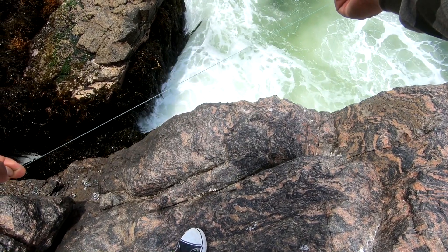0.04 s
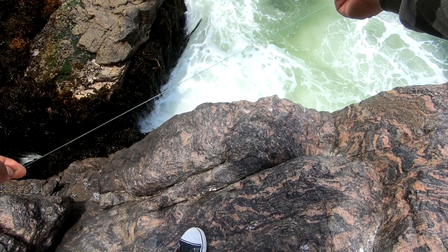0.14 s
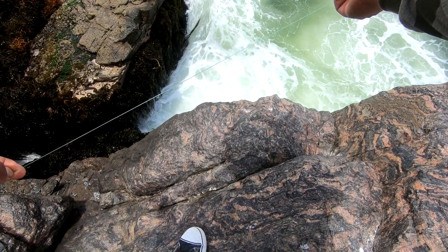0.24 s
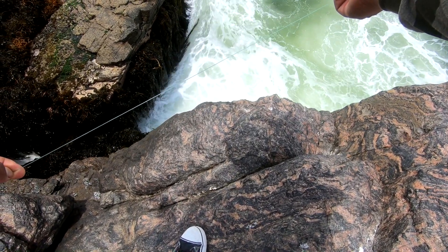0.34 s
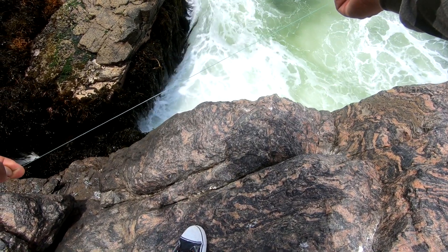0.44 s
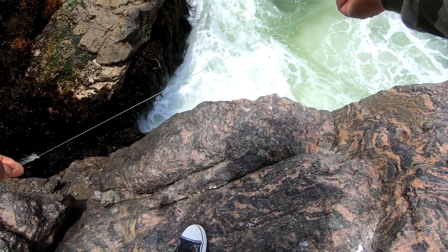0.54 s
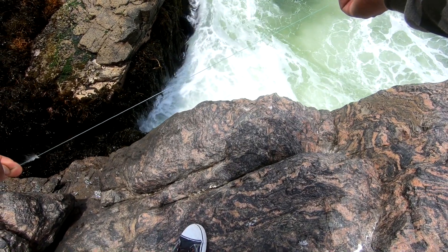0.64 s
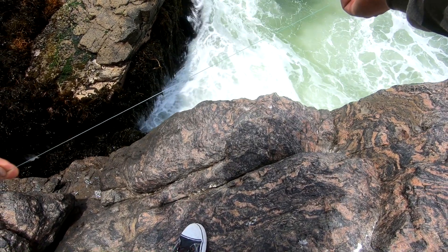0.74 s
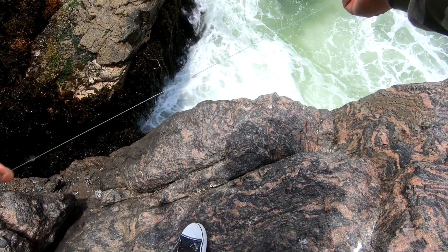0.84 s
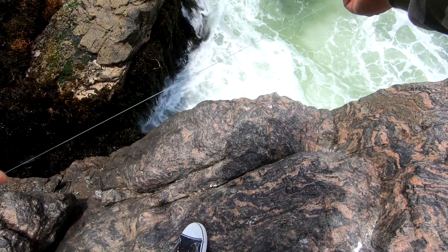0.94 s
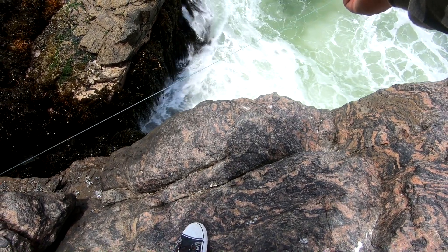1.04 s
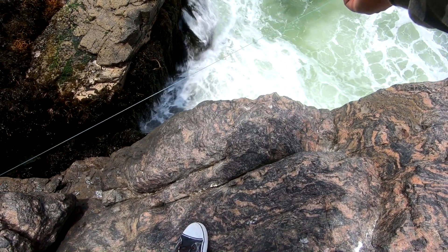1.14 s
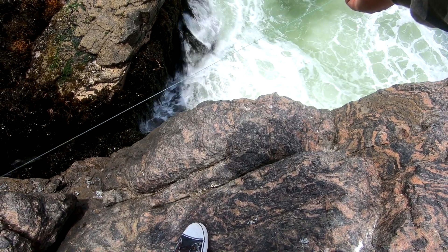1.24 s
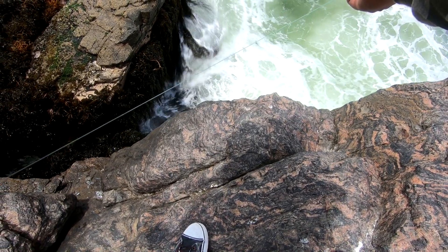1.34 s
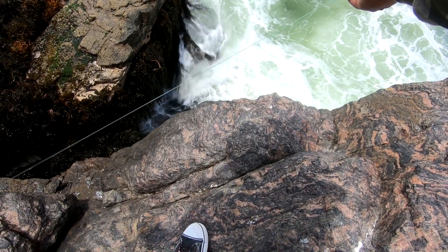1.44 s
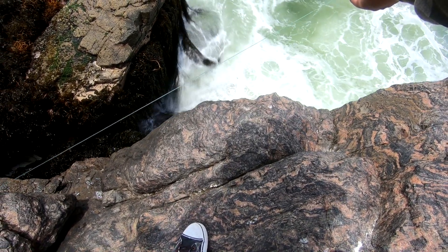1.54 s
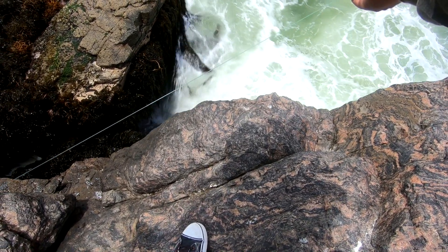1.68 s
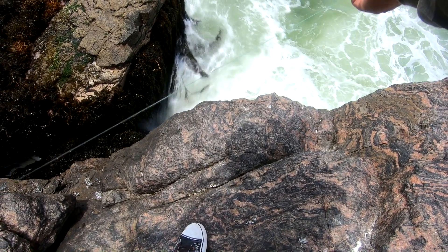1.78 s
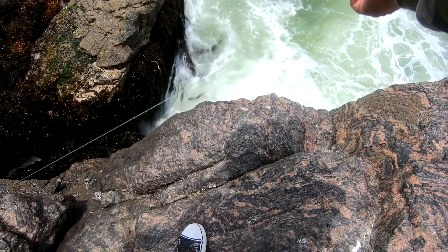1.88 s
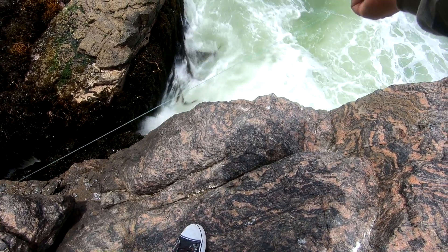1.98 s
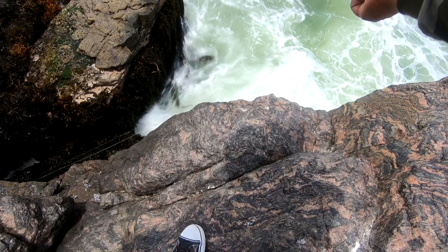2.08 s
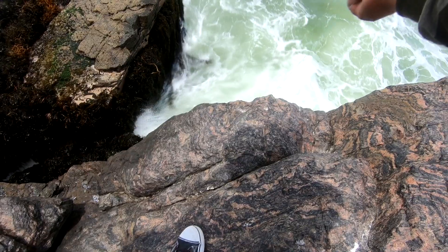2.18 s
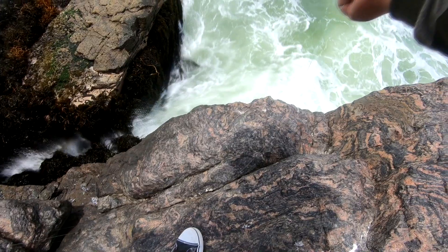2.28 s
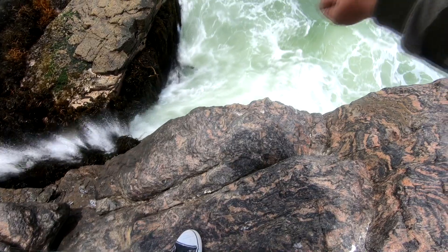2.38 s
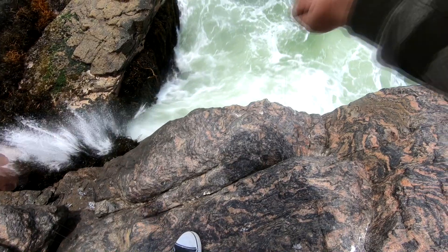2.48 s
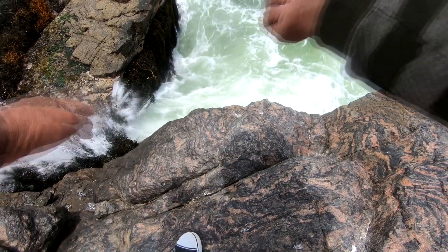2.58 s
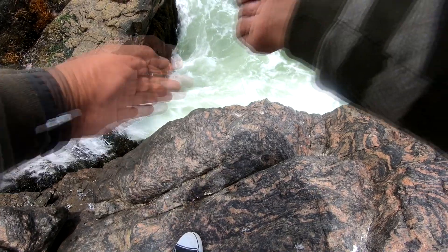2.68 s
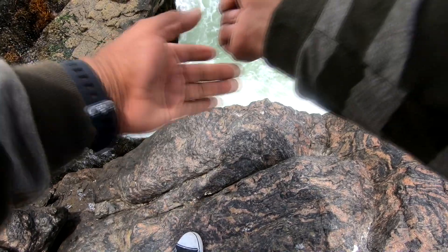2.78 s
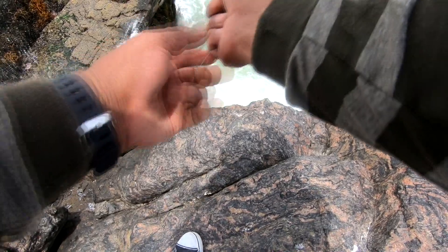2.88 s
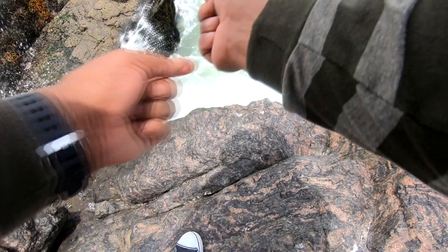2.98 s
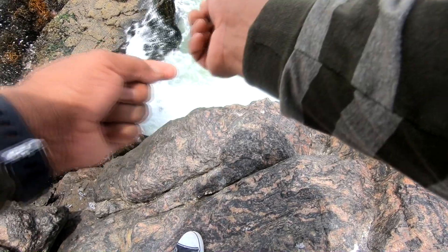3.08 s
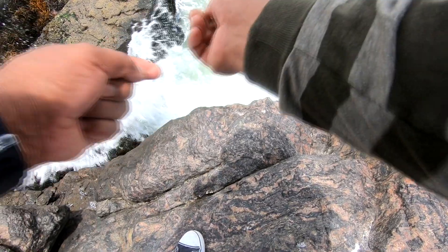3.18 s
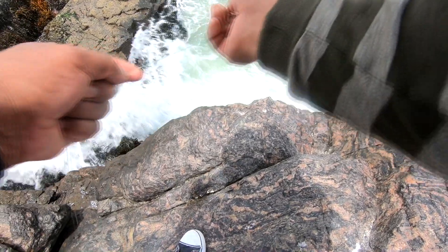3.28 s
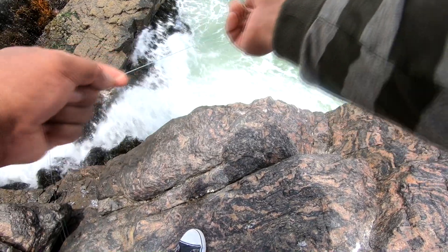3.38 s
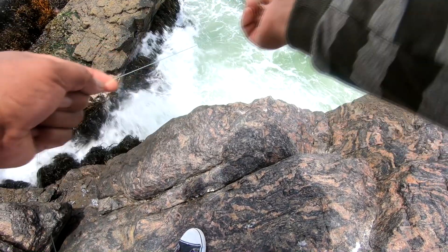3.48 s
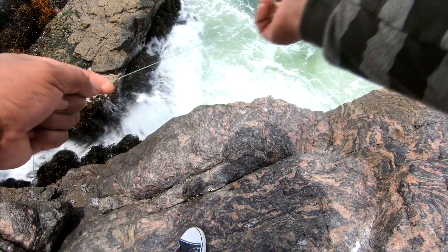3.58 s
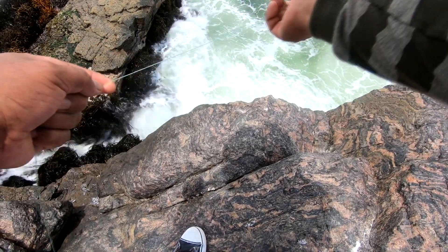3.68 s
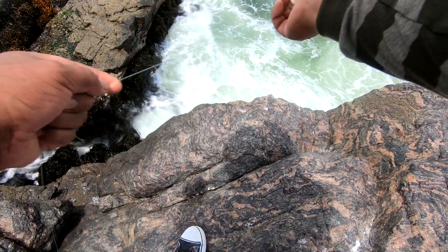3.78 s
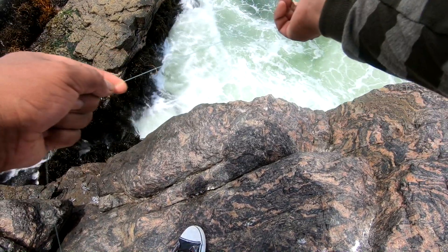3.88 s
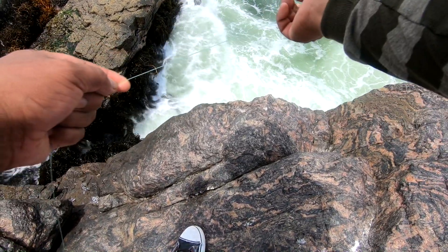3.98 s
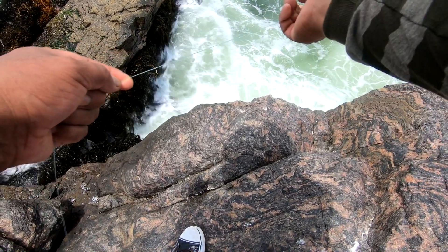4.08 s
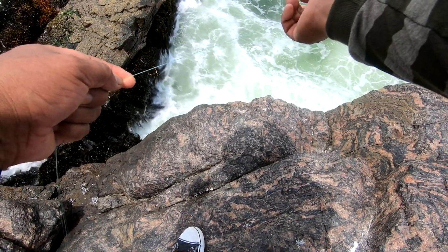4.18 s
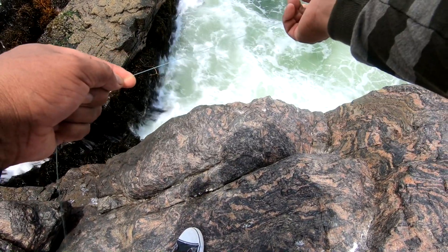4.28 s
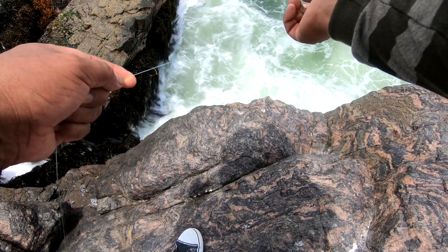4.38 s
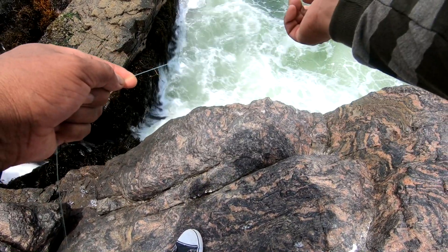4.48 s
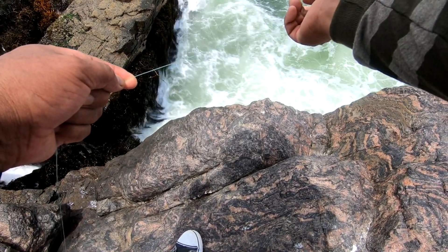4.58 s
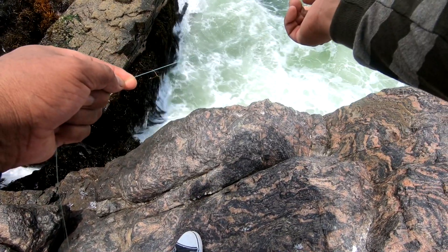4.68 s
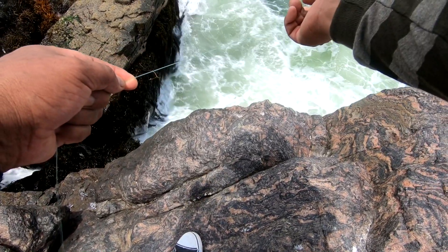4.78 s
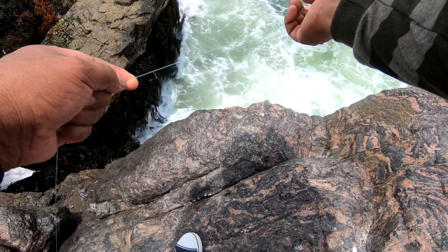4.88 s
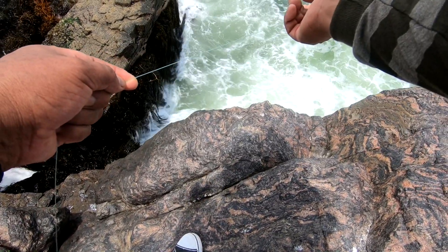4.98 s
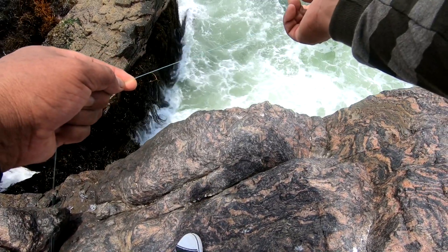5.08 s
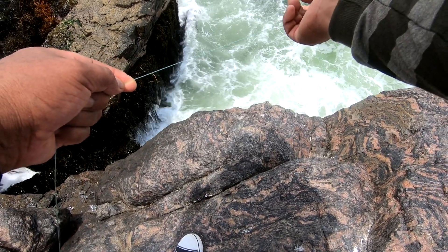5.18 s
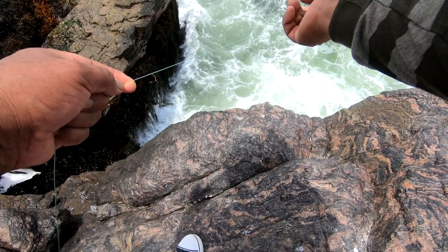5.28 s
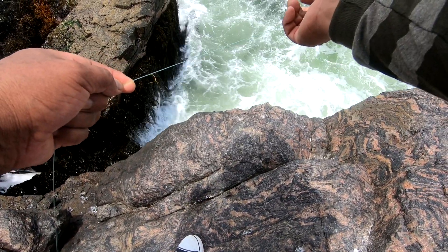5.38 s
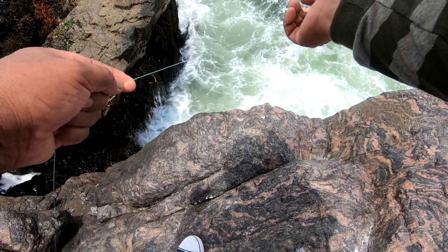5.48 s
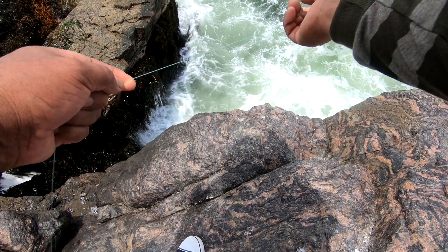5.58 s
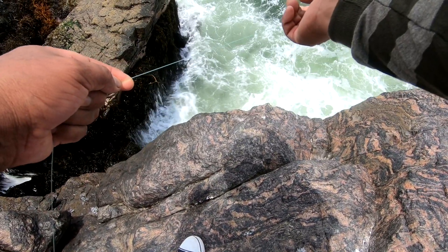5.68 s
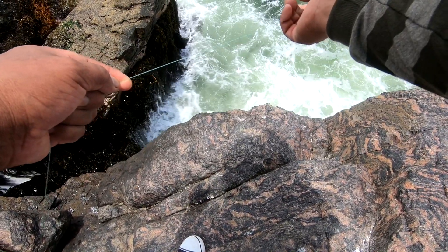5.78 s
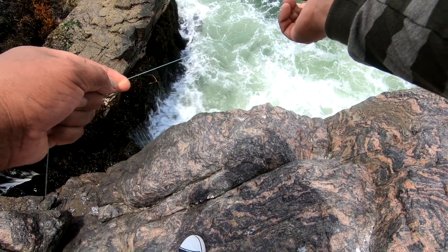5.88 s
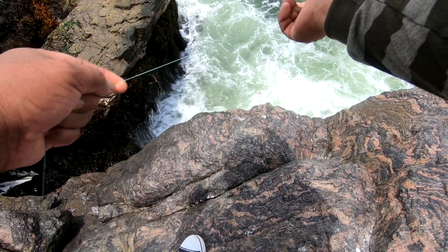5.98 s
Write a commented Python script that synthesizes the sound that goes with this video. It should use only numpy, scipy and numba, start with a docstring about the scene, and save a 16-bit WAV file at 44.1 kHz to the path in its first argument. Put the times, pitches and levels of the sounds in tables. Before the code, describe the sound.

Rough sea surf churns against rocks below a cliff, making a steady, fizzing wash of foam. A wave builds and breaks in loud, hissing spray as wind roars and thumps on the microphone. After a brief dip, a second surge rushes into a rock gap with a slightly hollow tone. Then the water settles back to a softer wash, with a few lighter puffs of wind.

```python
"""Rocks below a cliff: rough surf, heard through one small shielded microphone.
Bursting foam makes a steady wash under surges of spray and rings in a rock gap;
a thin, wide hiss tops the two loudest surges. Gusts buffet the microphone port:
slow eddies thud, fast ones roar, single puffs land on top."""
import sys
import numpy as np
from scipy import signal
from scipy.fft import rfft, irfft, next_fast_len
from scipy.io import wavfile
from scipy.ndimage import uniform_filter1d
from numba import njit

SR = 44100
rng = np.random.default_rng(int(sys.argv[2]) if len(sys.argv) > 2 else 0)


def master_out(mix):
    """Clip the mix to full scale and print it as 16-bit PCM to the path in sys.argv[1]."""
    frames = np.transpose(np.atleast_2d(mix))
    ceiling = np.clip(frames, -1, 1)
    pcm = np.round(ceiling * 32767).astype(np.int16)
    wavfile.write(sys.argv[1], SR, pcm)


N = 266364

# wind at the port (time [s], middle-eddy level [dB], lean to larger [dB], lean to finer [dB])
GUSTS = [(0, -38, 7, 0.5), (.06, -37.5, 2.5, 2), (.13, -40.5, -3, -2.5), (.32, -38.5, 0, 1),
         (.39, -31.5, -6, 2), (.53, -31.5, 6, 0), (.58, -39, 1.5, 1), (.72, -39, 6.5, 0),
         (.78, -32, 4, 0.5), (1.1, -35, 0, 4.5), (1.4, -26, -7.5, 2), (1.9, -22.5, -5.5, -2.5),
         (2.2, -23, -1.5, 2), (2.55, -22, -7.5, 2.5), (3.0, -23, -3, -1.5), (3.5, -28, -0.5, -1),
         (3.9, -31.5, 1.5, 0.5), (4.04, -30, 4.5, -1.5), (4.1, -34, 1, -8), (4.35, -33.5, 1.5, -6),
         (4.53, -41.5, -1, -1), (4.9, -38, 4, -2.5), (5.2, -40.5, 2, -1), (5.33, -35.5, 2, 2),
         (5.45, -39, 0, -6), (5.75, -38, 0.5, 0), (6.04, -38.5, -2.5, 1.5)]
# eddy spectra, largest to finest (frequency [Hz], relative level [dB])
SLOW_SPECTRUM = [(12, -22), (22, -2.5), (50, 4), (85, 2.5), (125, -0.5), (300, -51), (2000, -120)]
LARGE_SPECTRUM = [(30, -45), (75, -2.5), (110, -1.5), (180, 3), (260, -20), (600, -63), (3000, -120)]
MIDDLE_SPECTRUM = [(60, -51), (170, -14), (230, 0), (300, 0), (420, -2.5), (580, -18), (1000, -68),
                   (4000, -120)]
FAST_SPECTRUM = [(150, -47), (380, -12.5), (480, -2.5), (650, -4), (850, -11), (1000, -24.5), (1600, -46),
                 (5000, -120)]
FINEST_SPECTRUM = [(500, -31), (800, -8.5), (950, 6), (1070, 2.5), (1150, -21), (1600, -48), (5000, -120)]
# shielded port (frequency [Hz], gain [dB])
PORT_RESPONSE = [(10, -6), (20, 0), (1100, -0.5), (1600, -34), (4000, -80), (9000, -130)]
# surf (time [s], strength [dB], lean toward the 6 kHz gap ring and sizzle, away from churn [dB])
SURGES = [(0, -43.5, -0.5), (.6, -42, -1), (1.0, -40, -3.5), (1.5, -37, 0), (1.85, -35.5, -2.5),
          (2.24, -35.5, 0.5), (2.3, -33, -4.5), (2.47, -31.5, 0.5), (2.59, -35, -0.5), (2.69, -33.5, -0.5),
          (2.76, -37.5, 1), (2.9, -38.5, 0.5), (3.26, -42, 2), (3.66, -36, 1.5), (3.87, -37, 2.5),
          (3.94, -38.5, 2), (4.05, -39.5, 1.5), (4.12, -42, -1), (4.3, -43.5, -1.5), (5.0, -43.5, -2),
          (5.6, -43, -1.5), (6.04, -41, 0.5)]
# bubble spectra, large to finest (frequency [Hz], relative level [dB])
CHURN_SPECTRUM = [(400, -29), (800, 5.5), (1100, -1.5), (1450, -2), (1830, -2), (2150, -4), (2600, -12.5),
                  (4000, -52), (9000, -100)]
SPRAY_SPECTRUM = [(1500, -28), (2150, -12.5), (2500, -5.5), (3000, -5), (3800, -3.5), (4400, -4.5),
                  (5100, -12), (6000, -32), (9000, -76), (14000, -120)]
SIZZLE_SPECTRUM = [(3000, -38), (4900, -4.5), (5750, -2), (6500, -4), (7900, -12.5), (9500, -24),
                   (11000, -36), (13000, -44.5), (15500, -76)]
# rock gap (time [s], resonance [Hz], resonance level [dB], low-ring level [dB])
GAP_TRACK = [(0, 3100, -59, -63), (.6, 3100, -57, -58), (.95, 2730, -44, -61), (1.5, 2900, -44.5, -50),
             (2.2, 2900, -44.5, -50), (2.32, 3020, -44, -44), (2.7, 3420, -43, -47), (3.0, 3260, -61, -56),
             (3.45, 3300, -49, -55), (3.68, 3310, -41.5, -49), (4.03, 3140, -38.5, -53),
             (4.15, 3300, -54, -57), (4.6, 3270, -49, -56.5), (6.04, 3240, -61, -63)]
# steady rings of the gap (frequency [Hz], relative level [dB])
LOW_RING_SPECTRUM = [(1300, -47), (1680, -11), (1780, -1), (1900, 0.5), (2020, -11), (2600, -51),
                     (8000, -110)]
HIGH_RING_SPECTRUM = [(4000, -44), (5250, -11), (5550, 5), (6150, -2), (6600, -15), (9000, -53),
                      (14000, -110)]
# faint left-right difference added to the surf sound (frequency [Hz], base gain [dB])
DIFFERENCE_RESPONSE = [(300, -66), (600, -53), (1100, -33), (2200, -37.5), (4500, -40.5), (8000, -22),
                       (11000, -29)]
# that difference, dropping out after about 4.1 s (time [s], added gain [dB])
DIFFERENCE_TRACK = [(0, 0), (1.6, 9), (1.8, -10.5), (4.05, -2), (4.2, -25), (6.04, -30)]
# puffs ahead of the port filter (time [s], push peak [dB], push centre [Hz], slap peak [dB])
PUFF_EVENTS = [(0.315, -30.5, 81, -37), (0.517, -24, 510, -19), (0.744, -24.5, 546, -40),
               (0.767, -22, 90, -29), (1.438, -22, 317, -30), (1.877, -23, 380, -22), (2.08, -14, 170, -29),
               (2.379, -14, 151, -25), (2.609, -12.5, 156, -23), (2.669, -13, 328, -31),
               (3.149, -18.5, 67.3, -38), (3.2, -22, 50, -36), (3.392, -21.5, 106, -34),
               (3.546, -16.5, 136, -19.5), (3.797, -18.5, 135, -41), (3.878, -20, 158, -32),
               (3.959, -15, 115, -23), (4.021, -16.5, 59.7, -24.5), (4.126, -18.5, 158, -48),
               (4.249, -27, 93, -47), (4.919, -25, 179, -35), (5.066, -28, 60, -46),
               (5.141, -19.5, 87, -34), (5.347, -23.5, 135, -21.5), (5.769, -26, 55, -36),
               (5.82, -30.5, 60, -38)]
# hiss on the surges (time [s], level before pan [dB])
HISS_TRACK = [(0.3, -91), (0.79, -85), (1.03, -89), (1.89, -65), (2.3, -62), (2.38, -55), (2.56, -62),
              (3.16, -70), (3.6, -62), (3.88, -63), (3.98, -73), (4.08, -100), (4.2, -105)]
# hiss spectrum (frequency [Hz], relative level [dB])
HISS_SPECTRUM = [(8000, -69), (10000, -31.5), (11400, -6), (12300, 3), (13500, 1), (15500, -2),
                 (17000, -19)]


def from_db(db):
    """dB to gain."""
    return 10 ** (np.asarray(db) / 20)


def unit_rms(x):
    """Scale to rms 1."""
    return x / np.sqrt(np.mean(x ** 2) + 1e-20)


def per_sample(rows):
    """Table columns, linearly interpolated over time."""
    times_s, *columns = np.transpose(rows)
    return [np.interp(np.arange(N) / SR, times_s, column) for column in columns]


def colour(x, spectrum):
    """Filter by (Hz, dB) points, linear over log frequency."""
    size = next_fast_len(N)
    hz = np.maximum(np.arange(size // 2 + 1) * SR / size, 1)
    points_hz, points_db = np.transpose(spectrum)
    gain = from_db(np.interp(np.log(hz), np.log(points_hz), points_db))
    return irfft(rfft(x, size) * gain, size)[..., :N]


def drift(rate_hz):
    """Slow random wander, rms 1: noise through a double one-pole low-pass."""
    hop, settle = 40, 2000
    pole = np.exp(-2 * np.pi * rate_hz * hop / SR)
    noise = rng.standard_normal(N // hop + 2 + settle)
    slow = signal.lfilter([1], [1, -2 * pole, pole * pole], noise)[settle:]
    return np.interp(np.arange(N) / hop, np.arange(len(slow)), unit_rms(slow))


def eddies(spectrum, even_s, lump_hz, lump_db):
    """Eddies of like strength: noise evened over a few turns, then made slightly lumpy; rms 1."""
    noise = colour(rng.standard_normal(N), spectrum)
    strength = np.sqrt(uniform_filter1d(noise ** 2, size=int(even_s * SR)) + 1e-12)
    evened = noise / uniform_filter1d(strength, size=int(even_s * SR / 2))
    return unit_rms(evened * from_db(lump_db * drift(lump_hz)))


def wind():
    """Five eddy sizes follow the gusts, the finest growing louder in strong wind; puffs join at the port."""
    middle_db, larger_db, finer_db = per_sample(GUSTS)
    mean_wind_db, strong_wind_db = -30, -26
    gust_db = middle_db - mean_wind_db
    sustained_db = uniform_filter1d(middle_db, size=SR // 4)
    slow_db = -35.5 + 0.8 * gust_db + larger_db
    large_db = -32.5 + 0.96 * gust_db + 0.78 * larger_db
    fast_db = -34 + 0.49 * gust_db + 0.93 * finer_db
    finest_db = -47.5 + 0.79 * (sustained_db - strong_wind_db)
    slow = from_db(slow_db) * eddies(SLOW_SPECTRUM, even_s=0.08, lump_hz=16, lump_db=1.6)
    large = from_db(large_db) * eddies(LARGE_SPECTRUM, even_s=0.053, lump_hz=16.4, lump_db=3.0)
    middle = from_db(middle_db) * eddies(MIDDLE_SPECTRUM, even_s=0.08, lump_hz=64, lump_db=1.0)
    fast = from_db(fast_db) * eddies(FAST_SPECTRUM, even_s=0.071, lump_hz=39, lump_db=1.0)
    finest = from_db(finest_db) * eddies(FINEST_SPECTRUM, even_s=0.11, lump_hz=33, lump_db=0.5)
    return colour(slow + large + middle + fast + finest + puffs(), PORT_RESPONSE)


def bursts(per_s, spread_db, clump_hz, clump_db):
    """Bursting bubbles: impulses at random times, uneven in size, clumped in level."""
    bursting = rng.random(N) < per_s / SR
    sizes = from_db(spread_db * np.minimum(rng.exponential(1, N), 4))
    signs = rng.choice([-1, 1], N)
    return bursting * sizes * signs * from_db(clump_db * drift(clump_hz))


def surf():
    """Large bubbles churn, fine ones spray, the finest sizzle; the rock gap rings along."""
    surf_db, fizz_db = per_sample(SURGES)
    mean_surf_db = -40
    surge_db = surf_db - mean_surf_db
    churn_db = -44 + 0.7 * surge_db - 0.5 * fizz_db
    spray_db = surf_db - 1
    sizzle_db = -46.5 + 1.13 * surge_db + 0.33 * fizz_db
    high_ring_db = -52.5 + 0.91 * surge_db + 2 * fizz_db
    large = bursts(per_s=12000, spread_db=4.0, clump_hz=17, clump_db=0.43)
    fine = bursts(per_s=25000, spread_db=2.5, clump_hz=45, clump_db=0.76)
    finest = bursts(per_s=25000, spread_db=3.5, clump_hz=27, clump_db=0.32)
    churn = from_db(churn_db) * unit_rms(colour(large, CHURN_SPECTRUM))
    spray = from_db(spray_db) * unit_rms(colour(fine, SPRAY_SPECTRUM))
    sizzle = from_db(sizzle_db) * unit_rms(colour(finest, SIZZLE_SPECTRUM))
    return churn + spray + sizzle + rock_gap(high_ring_db)


@njit
def moving_resonance(x, centre_hz, width_hz):
    """Two-pole band-pass, retuned every sample."""
    out = np.zeros(len(x))
    radius = np.exp(-np.pi * width_hz / SR)
    for i in range(2, len(x)):
        feedback = 2 * radius * np.cos(2 * np.pi * centre_hz[i] / SR)
        out[i] = x[i] - x[i - 2] + feedback * out[i - 1] - radius * radius * out[i - 2]
    return out


def rock_gap(high_ring_db):
    """Foam drives two steady rings and a hollow resonance that rises as water fills the gap."""
    centre_hz, hollow_db, low_ring_db = per_sample(GAP_TRACK)
    foam = bursts(per_s=23000, spread_db=3.0, clump_hz=7.9, clump_db=1.9)
    hollow = moving_resonance(foam, centre_hz, width_hz=520.0)
    hollow = moving_resonance(hollow, centre_hz, width_hz=610.0)
    hollow = colour(hollow, [(4000, -3.0), (8000, -27), (14000, -74)])
    low_ring = from_db(low_ring_db) * unit_rms(colour(foam, LOW_RING_SPECTRUM))
    high_ring = from_db(high_ring_db) * unit_rms(colour(foam, HIGH_RING_SPECTRUM))
    return from_db(hollow_db) * unit_rms(hollow) + low_ring + high_ring


def left_right_flicker(surf_sound):
    """Faint, flickering left-right difference added to the surf sound; drops out after about 4.1 s."""
    gain_db, = per_sample(DIFFERENCE_TRACK)
    flicker_db = 5 * drift(rate_hz=8)
    shifted = np.roll(surf_sound, SR // 20)  # 50 ms
    difference = colour(shifted, DIFFERENCE_RESPONSE) * from_db(gain_db + flicker_db)
    return difference * [[1], [-1]]


def swell(t, rise_s):
    """Envelope: 1 at rise_s, then decay."""
    return (t / rise_s * np.exp(1 - t / rise_s)) ** 2


def puffs():
    """Single puffs on the port: a low push peaking just after a short, bright slap begins."""
    out, t = np.zeros(N), np.arange(4000) / SR
    push_lag_s = 0.00599
    noises = rng.standard_normal((len(PUFF_EVENTS), 2, len(t)))
    slap_band = signal.butter(4, [380, 780], "band", fs=SR, output="sos")
    for (time_s, push_db, hz, slap_db), (push_noise, slap_noise) in zip(PUFF_EVENTS, noises):
        push_band = signal.butter(2, [hz * 0.65, min(hz * 1.48, 750)], "band", fs=SR, output="sos")
        rise_s = 0.012 + 0.6 / hz  # larger puffs swell longer
        lead_s = rise_s - push_lag_s
        slap_age_s = np.maximum(t - lead_s, 0)
        push = signal.sosfilt(push_band, push_noise) * swell(t, rise_s)
        slap = signal.sosfilt(slap_band, slap_noise) * swell(slap_age_s, rise_s=0.0084) ** 2
        start = max(round((time_s - lead_s) * SR), 0)
        out[start:start + len(t)] += from_db(push_db) * push / np.abs(push).max()
        out[start:start + len(t)] += from_db(slap_db) * slap / np.abs(slap).max()
    return out


def surge_hiss():
    """Thin hiss on the loudest surges: independent noise per side, stronger on the right."""
    level_db, = per_sample(HISS_TRACK)
    pan_db = 4.5
    hiss = unit_rms(colour(rng.standard_normal((2, N)), HISS_SPECTRUM))
    return hiss * from_db(level_db) * from_db([[-pan_db / 2], [pan_db / 2]])


def scene():
    """Mono wind and surf, a faint left-right flicker, wide hiss."""
    surf_sound = surf()
    flicker = left_right_flicker(surf_sound)
    return wind() + surf_sound + flicker + surge_hiss()


def record(dry):
    """Soft clip on the loudest buffets, then a steep low-pass."""
    ceiling, cutoff_hz = 0.9, 15700
    rounded = ceiling * np.tanh(dry / ceiling)
    low_pass = signal.ellip(12, 0.5, 70, cutoff_hz, fs=SR, output="sos")
    return signal.sosfilt(low_pass, rounded)


dry = scene()
out = record(dry)
master_out(out)
```